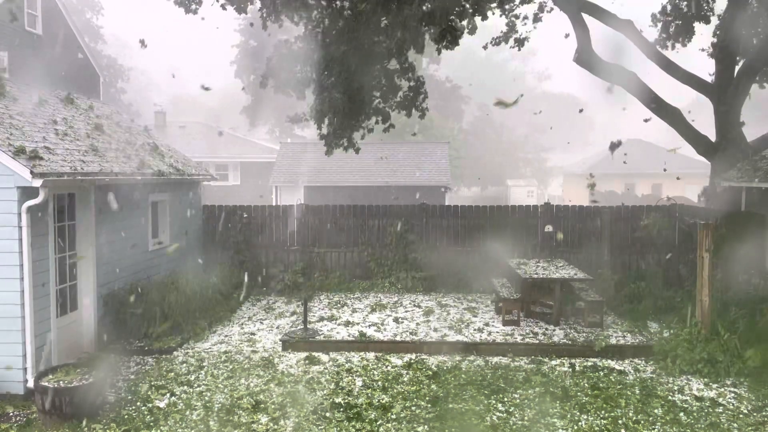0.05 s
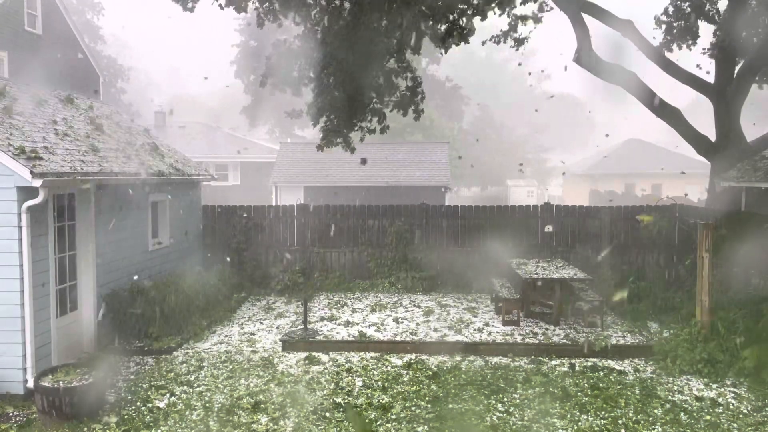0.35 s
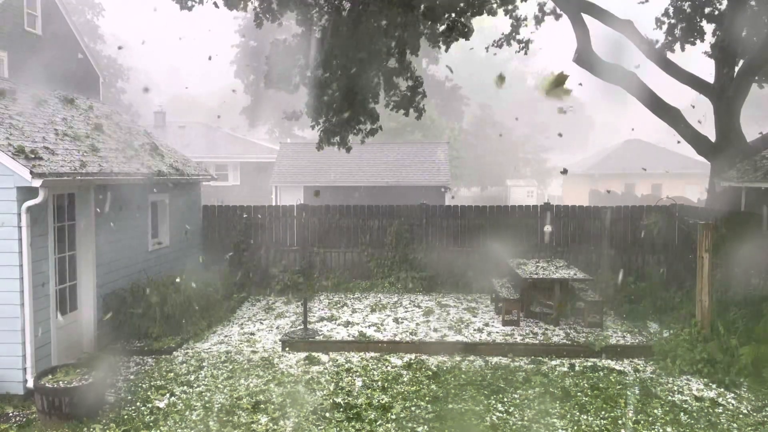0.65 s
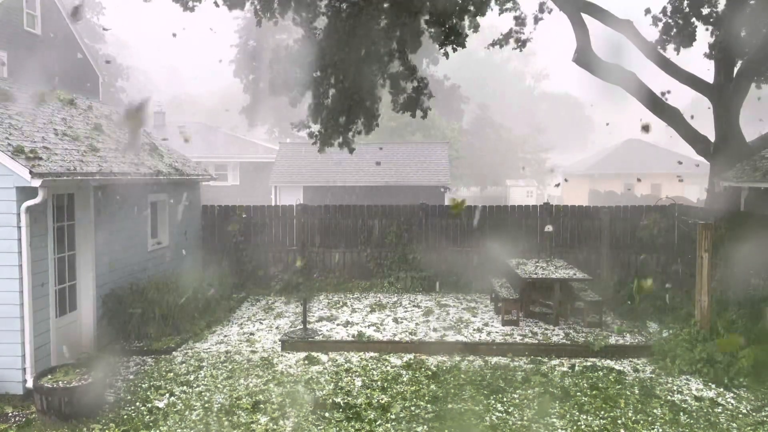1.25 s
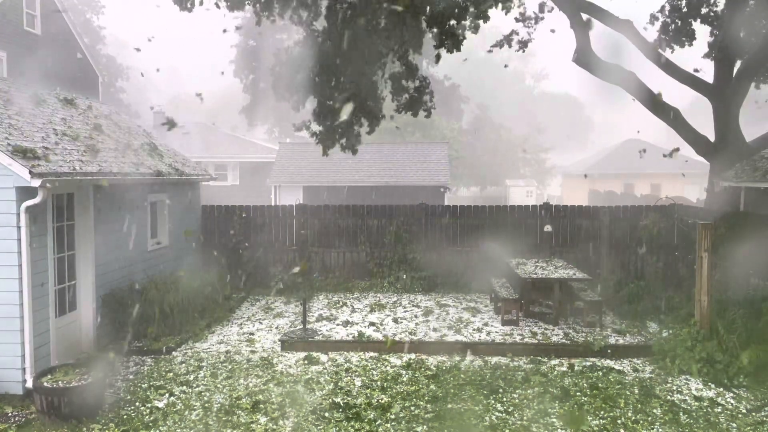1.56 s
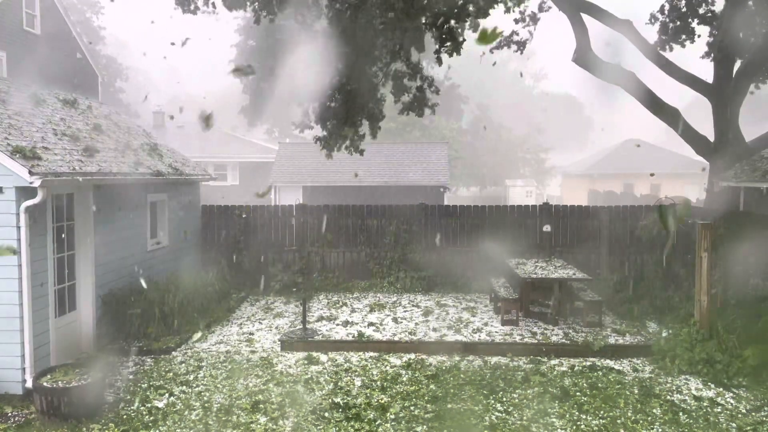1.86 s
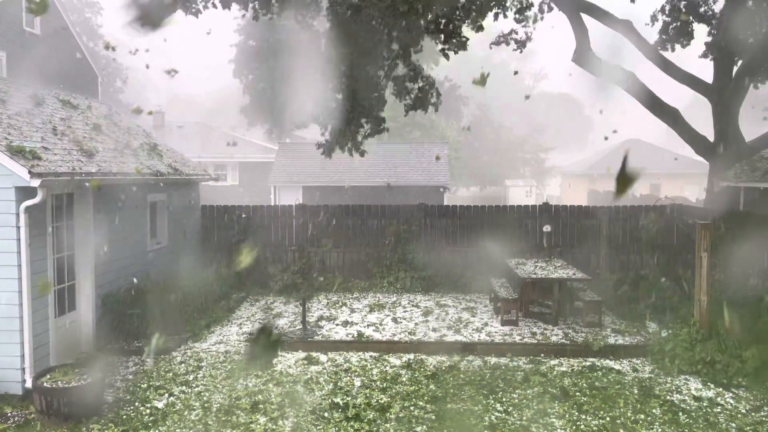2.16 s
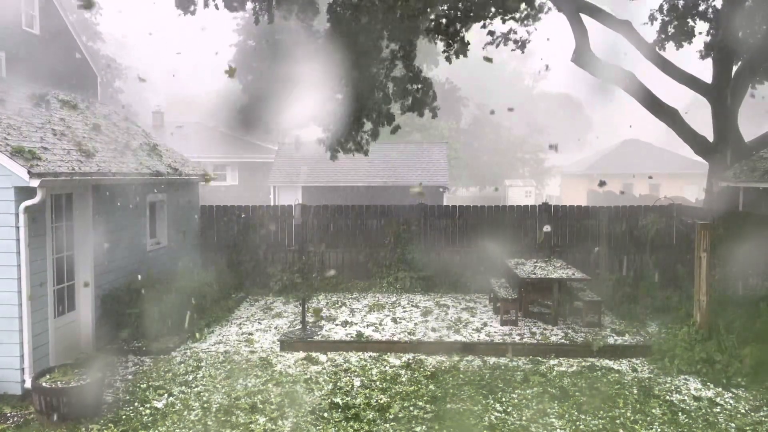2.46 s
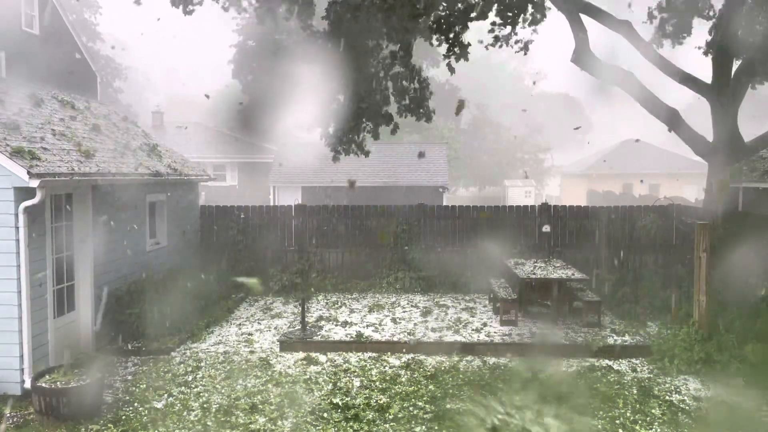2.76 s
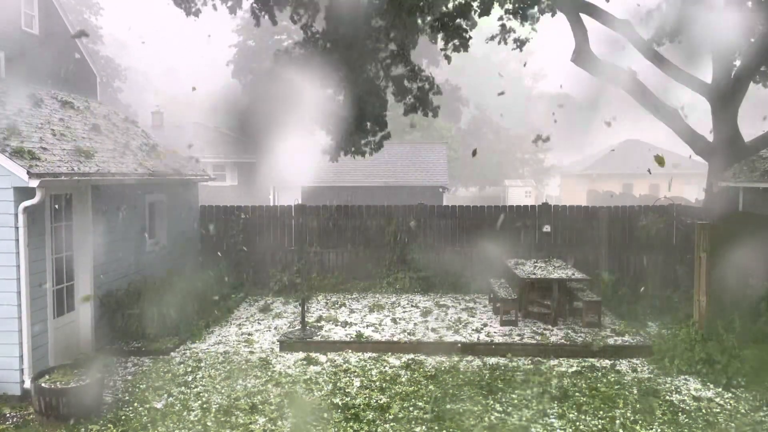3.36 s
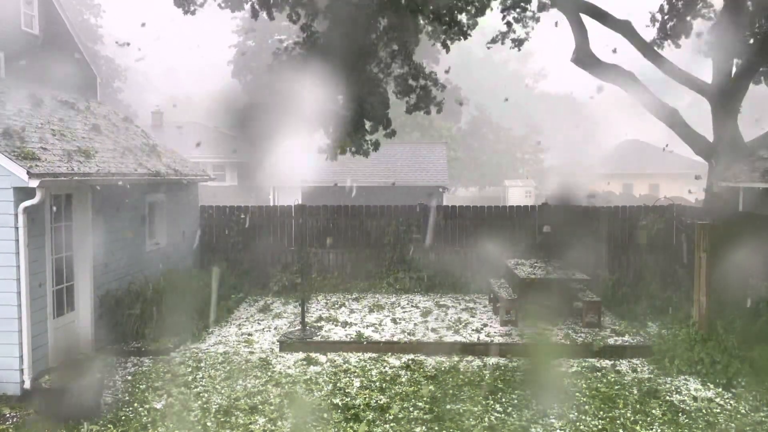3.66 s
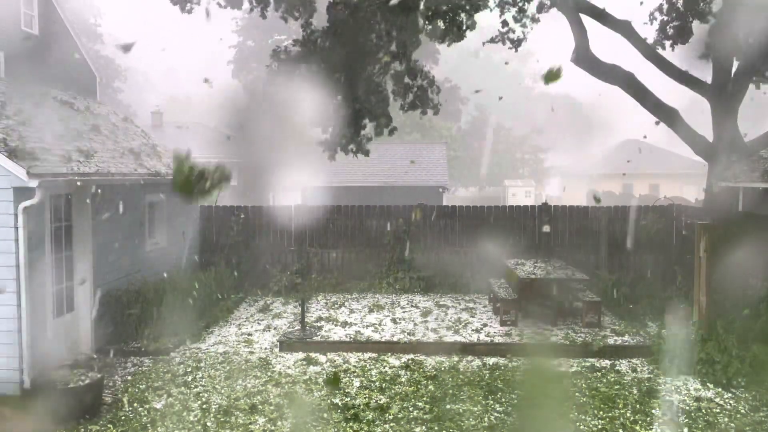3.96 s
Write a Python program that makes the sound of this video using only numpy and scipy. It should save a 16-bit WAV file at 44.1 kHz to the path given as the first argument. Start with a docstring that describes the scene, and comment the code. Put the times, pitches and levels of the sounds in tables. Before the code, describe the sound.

Heavy hail pelts a backyard, heard from shelter. Small stones patter on hard ground and drum overhead while rain hisses on grass and leaves. Big stones knock sharply on nearby boards at irregular moments, over a low roof rumble.

```python
"""Backyard hailstorm, heard from shelter.

Big stones knock and crack on boards close by; heavy ones thud on roof and walls.
Smaller stones patter on hard ground and drum overhead; rain and far hail hiss on grass and leaves.
The roof booms in its low resonances over the rumble of the storm. A limiter holds the peaks."""
import sys
import numpy as np
from scipy import signal
from scipy.fft import rfft, irfft, next_fast_len
from scipy.io import wavfile
from scipy.ndimage import uniform_filter1d, minimum_filter1d, map_coordinates

SR = 44100
rng = np.random.default_rng(int(sys.argv[2]) if len(sys.argv) > 2 else 0)


def dump(signal):
    """Clip the signal to [-1, 1] and save it as 16-bit WAV at the path in sys.argv[1]."""
    limited = np.clip(np.atleast_2d(signal).T, -1, 1)
    pcm = np.round(limited * 32767).astype(np.int16)
    wavfile.write(sys.argv[1], SR, pcm)


N = 176400

# Ring of struck boards: (frequency [Hz], gain [dB])
BOARD_SPECTRUM = [(200, 5), (620, 1.5), (790, 2.5), (960, 2), (1120, 0.5), (1450, -1), (1700, 4),
                  (2050, -1.5), (2460, 3.5), (2750, 1), (4050, -1), (4600, -13), (9000, -48), (14000, -73)]
# Shattering ice: (frequency [Hz], gain [dB])
ICE_SPECTRUM = [(2500, -28), (4500, 7.5), (8500, 2), (10000, -4.5), (13000, -1.5), (15000, -37)]
# Big stones: (time [s], body level [dB], body pitch [Hz], clack level [dB], clack pitch [Hz],
# clack width [octaves], crack level [dB], crack pitch [Hz], left over right [dB], base t60 [s])
BOARD_HITS = [(.196, -22.5, 834, -27, 1950, 1, -36, 7100, 5.5, 0.025),
              (.254, -38, 900, -19.5, 1770, 1, -38, 6000, 3, .018),
              (0.39, -22, 1060, -22.5, 1990, 0.83, -37, 6030, 1.5, 0.037),
              (0.551, -38, 900, -23, 2350, 0.55, -41, 8400, 4, 0.017),
              (0.612, -13, 920, -8.5, 2470, 0.79, -19.5, 6650, -.5, .024),
              (.683, -48, 393, -23.5, 3780, 0.15, -46, 6000, -2, 0.015),
              (.800, -31, 710, -32, 2480, 0.5, -28, 6650, -2.5, 0.012),
              (0.8252, -14, 796, -16.5, 2144, 1, -23.5, 6450, -1, 0.033),
              (.925, -22.5, 900, -20, 2440, 0.69, -52, 6000, 0, 0.008),
              (1.108, -30, 910, -24, 3320, 0.3, -33, 5470, 4, 0.022),
              (1.2682, -14, 1010, -8, 3520, 0.22, -25, 8250, -2, 0.0084),
              (1.3328, -17, 900, -18.5, 2650, 0.18, -52, 6000, 12, .009),
              (1.342, -9, 954, -19, 1520, .7, -37, 6000, 1, 0.024),
              (1.578, -17.5, 1080, -17.5, 2280, .61, -46, 6000, -2, 0.0082),
              (1.7951, -11, 832, -10.5, 2210, 0.84, -20.5, 6900, 0.5, 0.022),
              (2.089, -30, 600, -19, 2040, 1, -41, 5000, 3, 0.034),
              (2.348, -21.5, 706, -28, 3070, 0.6, -34, 5070, 2, 0.042),
              (2.3866, -17.5, 915, -17, 2040, 0.96, -29, 6150, 0, 0.033),
              (2.579, -26.5, 990, -21, 1810, 0.54, -53, 6000, -2, 0.021),
              (2.612, -26, 890, -25, 2980, 0.17, -46, 5500, 7, 0.028),
              (2.667, -23, 1010, -16, 3560, 0.54, -23.5, 7840, -1, 0.0075),
              (2.6863, -23.5, 1060, -17, 2550, 0.64, -31, 6900, 4.5, 0.016),
              (2.755, -24.5, 590, -42, 3000, .67, -36, 9700, 7, 0.01),
              (2.911, -21, 900, -9, 3020, 0.43, -8, 6140, 2, 0.013),
              (2.985, -21, 700, -22, 2370, 0.51, -48, 6000, -1, .018),
              (3.149, -16.5, 950, -10.5, 2350, 0.63, -33.5, 8100, -1.5, 0.017),
              (3.254, -39, 900, -22, 2380, 0.24, -38, 7000, 0, 0.02),
              (3.383, -44, 710, -20, 1950, 0.72, -50, 6000, -3, 0.0092),
              (3.396, -27, 730, -21.5, 1750, 0.78, -51, 6000, 1, 0.023),
              (3.718, -47, 900, -32, 3240, 0.34, -31, 6040, 4, 0.011),
              (3.921, -27, 920, -21, 2650, .25, -38, 6000, 2, 0.018),
              (3.962, -25.5, 580, -24.5, 2490, 0.65, -36, 7600, 4.5, 0.027)]


def knocks(gain_db=1.3):
    """Each big stone on the boards gives a woody body, a hard clack and the crack of ice."""
    out = np.zeros((2, N))
    for (start_s, body_db, body_hz, clack_db, clack_hz, clack_octaves,
         crack_db, crack_hz, left_db, t60_s) in BOARD_HITS:
        wood = resonance(body_hz, BOARD_SPECTRUM, octaves=0.74, slope=3.26)
        body = impact(wood, t60_s, echo_db=-7, echo_t60_s=12 * t60_s, attack_s=0.00042)
        body += amp(-1) * mode(body_hz, 1.42 * t60_s)
        hard_wood = resonance(clack_hz, BOARD_SPECTRUM, octaves=clack_octaves, slope=2.77)
        clack = impact(hard_wood, t60_s, echo_db=-8.5, echo_t60_s=8.2 * t60_s, attack_s=0.0001)
        clack += amp(-0.5) * mode(clack_hz, 1.6 * t60_s)
        ice = resonance(crack_hz, ICE_SPECTRUM, octaves=0.42, slope=3)
        crack = impact(ice, t60_s, echo_db=-15, echo_t60_s=4.5 * t60_s, attack_s=0.00019)
        pan = amp([[left_db / 2], [-left_db / 2]])
        hit = amp(body_db) * body + amp(clack_db) * clack + amp(crack_db) * crack
        mix_in(out, start_s, pan * hit)
    return amp(gain_db) * out


# Dull blows on roof and walls: (time [s], level [dB], pitch [Hz], shake t60 [s])
PANEL_HITS = [(.630, -23, 276, 0.21), (.764, -23, 180.5, .45), (.77, -28, 766, .42), (.995, -21, 63.5, .3),
              (1.041, -26.5, 453, 0.29), (1.228, -24, 746, 0.29), (1.343, -17.5, 480, 0.22),
              (1.621, -23.5, 340, 0.11), (1.734, -15, 107, 0.07), (2.093, -25, 630, 0.43),
              (2.248, -26, 57, 0.23), (2.354, -24.5, 256, 0.68), (2.409, -27, 540, .23),
              (2.741, -25, 111, 0.12), (2.73, -23.5, 676, 0.086), (2.917, -17, 525, 0.12),
              (2.975, -25.5, 98, 0.25), (3.161, -30, 316, 0.24), (3.73, -30, 60, .49)]


def thuds(gain_db=1.2):
    """Heavy stones shake roof and walls without a crack; the struck panel rings hollow."""
    out = np.zeros((2, N))
    for start_s, level_db, hz, t60_s in PANEL_HITS:
        panel = resonance(hz, BOARD_SPECTRUM, octaves=0.75, slope=3.8)
        shake = impact(panel, t60_s, echo_db=-27, echo_t60_s=0.28, attack_s=0.002)
        mix_in(out, start_s, amp(level_db) * (shake + mode(hz, t60_s / 2)))
    return amp(gain_db) * out


# Strength of the fall: (time [s], drum level [dB], patter and hiss level [dB])
FALL_LEVELS = [(0.0, -26, -26), (0.24, -30, -30.5), (0.73, -28.5, -28.5), (1.14, -29.5, -30),
               (1.25, -26.5, -26.5), (1.4, -30.5, -33), (1.7, -28.5, -28), (1.85, -33.5, -35.5),
               (2.06, -34, -30), (2.23, -30.5, -29.5), (2.67, -30.5, -30.5), (3.34, -29, -30.5),
               (3.68, -31, -31), (4.0, -32, -32)]
# Grass and leaves: (frequency [Hz], gain [dB])
HISS_SPECTRUM = [(200, -47), (900, 1.5), (1500, -7), (2000, -2), (2600, -2), (3950, -8), (4500, -19),
                 (6200, -13), (7400, -25.5), (9000, -26), (12500, -43.5), (14000, -56)]
# Hard ground: (frequency [Hz], gain [dB])
PATTER_SPECTRUM = [(200, -58), (900, 1), (1400, -9), (1700, 4.5), (2000, -11), (2480, 1), (3100, -2.5),
                   (3950, -6), (4500, -14.5), (6200, -23), (7500, -21), (9500, -23), (12500, -24.5),
                   (14000, -57)]
# Wood overhead: (frequency [Hz], gain [dB])
DRUM_SPECTRUM = [(60, -52), (170, 0.5), (300, -0.5), (500, -2.5), (900, -4), (1300, -6.5), (2000, -19.5),
                 (4000, -39), (9000, -78)]


def rain_and_hail(hiss_db=-0.8, patter_db=-1.2, drum_db=1, flutter_db=2.13):
    """Far rain and hail merge into a hiss; nearer stones patter on hard ground and drum on wood."""
    overhead_db, ground_db = curves(FALL_LEVELS)
    hiss = amp(hiss_db + flutter_db * wobble(rate_hz=22)) * coloured(noise(), spectrum(HISS_SPECTRUM))
    ground_hits = shower(rate_hz=650, spread_db=2.5, t60_s=0.031, pitch_hz=2680, log_spread=0.6)
    patter = amp(patter_db) * coloured(ground_hits, spectrum(PATTER_SPECTRUM))
    wood_hits = shower(rate_hz=400, spread_db=0.5, t60_s=0.09, pitch_hz=551, log_spread=0.8)
    drum = amp(drum_db) * coloured(wood_hits, spectrum(DRUM_SPECTRUM))
    return amp(ground_db) * (hiss + patter) + amp(overhead_db) * drum


def shower(rate_hz, spread_db, t60_s, pitch_hz, log_spread, surfaces=20):
    """Stones of random size land at random times on many surfaces, each with a short, pitched ring."""
    t = np.arange(SR // 12) / SR
    hz = np.fft.rfftfreq(len(t), 1 / SR)
    out = np.zeros((2, N))
    for _ in range(surfaces):
        centre_hz = pitch_hz * np.exp(log_spread * rng.normal())
        band = 1 / np.hypot(1, 3 * np.log2((hz + 1) / centre_hz))
        ring = irfft(rfft(noise(len(t))) * band, len(t))
        ring_t60_s = t60_s * np.exp(rng.normal(0, 0.39))
        channel_db = rng.normal(0, 2.2, (2, 1))
        ring *= amp(-60 * t / ring_t60_s + channel_db)
        landings = rng.random(N) < rate_hz / surfaces / SR
        sizes = amp(spread_db * np.minimum(rng.exponential(size=N), 4))
        out += signal.oaconvolve((landings * sizes)[None], unit_rms(ring), axes=1)[:, :N]
    return out


# Roof and storm rumble: (time [s], level [dB])
RUMBLE_LEVELS = [(0.0, -24.5), (0.73, -30), (0.78, -24.5), (0.83, -32.5), (1.04, -22), (1.16, -33.5),
                 (1.25, -23.5), (1.7, -34.5), (1.74, -19.5), (1.79, -28.5), (2.26, -26.5), (2.8, -24),
                 (2.9, -33), (3.01, -24.5), (4.0, -27.5)]
# Roof resonances: (frequency [Hz], bandwidth [Hz], gain [dB])
ROOF_MODES = [(62.1, 3.5, 4.5), (109, 18.6, -1), (184, 62, -9.5), (276.3, 33, -4)]
# Low storm noise: (frequency [Hz], gain [dB])
STORM_SPECTRUM = [(20, -26), (45, -6.5), (70, -5), (140, -10.5), (300, -18), (700, -46), (2000, -100)]


def roof_rumble(boom_db=-3, storm_db=-7, surge_db=1.5, cutoff_hz=500):
    """Hail keeps the roof booming in its low resonances, over the rumble of the storm."""
    def panel(hz):
        power = sum(np.abs(amp(db) * hz * width_hz / (mode_hz ** 2 - hz ** 2 + 1j * hz * width_hz)) ** 2
                    for mode_hz, width_hz, db in ROOF_MODES)
        return np.sqrt(power) / (1 + (hz / cutoff_hz) ** 4)

    level_db, = curves(RUMBLE_LEVELS)
    boom = amp(boom_db) * coloured(noise(), panel)
    envelope = amp(level_db + surge_db * wobble(rate_hz=9.52))
    storm = amp(storm_db) * coloured(noise(), spectrum(STORM_SPECTRUM))
    return envelope * (boom + storm)


def impact(response, t60_s, echo_db, echo_t60_s, attack_s, wall_s=0.00323, wall_db=-0.5):
    """A burst sounds through the struck material, bounces off the nearest wall and echoes in the yard."""
    def burst(age_s, decay_s):
        age_s = np.maximum(age_s, 0)
        return (1 - np.exp(-age_s / attack_s)) * amp(-60 * age_s / decay_s)

    t = np.arange(SR // 3) / SR
    bounce = amp(wall_db) * burst(t - wall_s, t60_s)
    echo = amp(echo_db) * burst(t, echo_t60_s)
    envelope = np.sqrt(burst(t, t60_s) ** 2 + bounce ** 2 + echo ** 2)
    return coloured(noise(len(t)) * envelope, response) * np.sqrt(np.mean(envelope ** 2))


def mode(hz, t60_s, left_lead_s=0.00004):
    """The strongest mode of a struck surface swells over its first cycle, then decays."""
    t = np.arange(SR // 3) / SR
    age_s = np.maximum(t - np.array([[0], [left_lead_s]]), 0)
    attack = 1 - np.exp(-(2 * hz * age_s) ** 2)
    return np.sin(2 * np.pi * hz * age_s) * attack * amp(-60 * age_s / t60_s)


def resonance(centre_hz, material, octaves, slope):
    """Frequency response of a cluster of close modes in a material."""
    return lambda hz: spectrum(material)(hz) / (1 + np.abs(np.log2((hz + 1) / centre_hz) / octaves) ** slope)


# Likeness of left and right: (frequency [Hz], correlation [clipped to -1..1])
STEREO_CORRELATION = [(50, 1), (170, 0.92), (260, 0.63), (420, 0.41), (700, -0.15), (1150, -0.27),
                      (1800, 0.29), (3000, 0.48), (5000, 0.83), (7500, -1.39), (9000, -0.012), (11500, 1),
                      (13000, -0.6)]
# Balance: (frequency [Hz], left over right [dB])
STEREO_BALANCE = [(100, -0.5), (400, 1.8), (1100, 0.8), (2200, 0.4), (3900, 3.5), (7000, -1), (13000, 0.5)]


def coloured(pair, response):
    """Filter two unrelated signals into partly correlated stereo of rms 1."""
    n = pair.shape[1]
    n_fft = 2 * next_fast_len(n // 2 + 2048)
    hz = np.fft.rfftfreq(n_fft, 1 / SR)
    cepstrum = irfft(np.log(np.maximum(response(hz), 1e-6)))
    cepstrum[1:n_fft // 2] *= 2  # fold to minimum phase
    cepstrum[n_fft // 2 + 1:] = 0
    width_rad = np.arccos(np.clip(log_interp(STEREO_CORRELATION, hz), -1, 1)) / 2
    mid, side = rfft(pair, n_fft) * np.exp(rfft(cepstrum)) * [np.cos(width_rad), np.sin(width_rad)]
    lean = amp(log_interp(STEREO_BALANCE, hz) / 2)
    stereo = np.array([(mid + side) * lean, (mid - side) / lean])
    return unit_rms(irfft(stereo, n_fft)[:, :n])


def spectrum(points):
    """Frequency response through (frequency [Hz], gain [dB]) points."""
    return lambda hz: amp(log_interp(points, hz))


def log_interp(points, hz):
    knots_hz, values = np.transpose(points)
    return np.interp(np.log(hz + 1), np.log(knots_hz + 1), values)


def curves(rows):
    """One value per sample for each column after the time."""
    times_s, *columns = np.transpose(rows)
    return [np.interp(np.arange(N) / SR, times_s, column) for column in columns]


def wobble(rate_hz):
    """Smooth random curve with knots at the given rate."""
    return map_coordinates(rng.standard_normal(1024), [np.arange(N) * rate_hz / SR], mode="wrap")


def noise(n=N):
    return rng.standard_normal((2, n))


def amp(db):
    return 10 ** (np.asarray(db) / 20)


def unit_rms(x):
    return x / np.sqrt(np.mean(x ** 2) + 1e-20)


def mix_in(track, start_s, sound):
    part = track[:, max(round(start_s * SR), 0):][:, :sound.shape[1]]
    part += sound[:, :part.shape[1]]


def scene():
    """Continuous fall and rumble under the single blows."""
    return rain_and_hail() + roof_rumble() + knocks() + thuds()


def record(dry, ceiling=0.76, cutoff_hz=15800):
    """Fast peak limiter, then a brick-wall low-pass."""
    needed_gain = np.minimum(1, ceiling / (np.abs(dry).max(axis=0) + 1e-9))
    gain = uniform_filter1d(minimum_filter1d(needed_gain, size=45), size=45)
    n_fft = next_fast_len(N + SR // 2)
    passband = np.fft.rfftfreq(n_fft, 1 / SR) < cutoff_hz
    return irfft(rfft(dry * gain, n_fft) * passband, n_fft)[:, :N]


dry = scene()
out = record(dry)
dump(out)
```